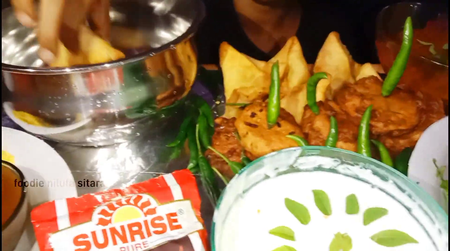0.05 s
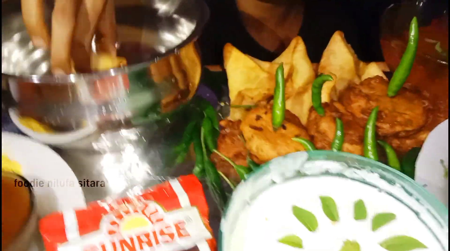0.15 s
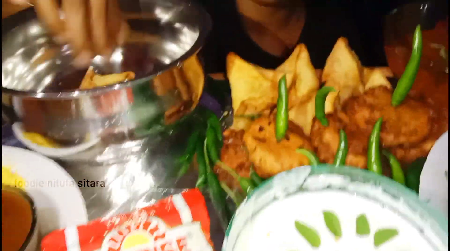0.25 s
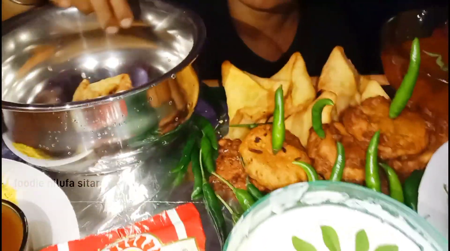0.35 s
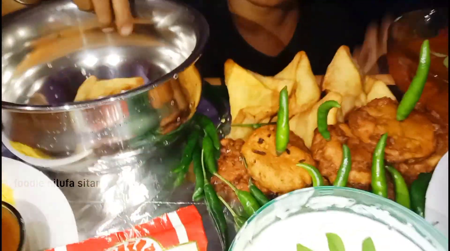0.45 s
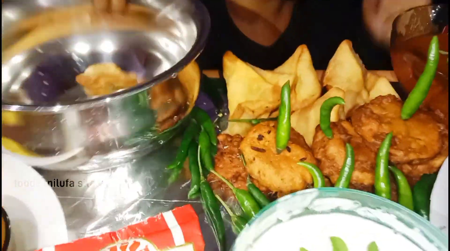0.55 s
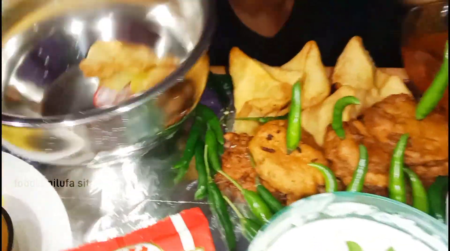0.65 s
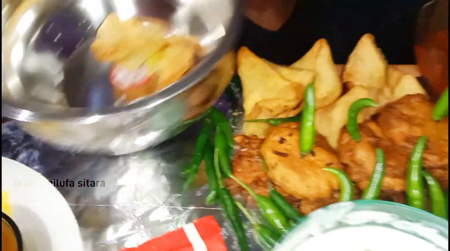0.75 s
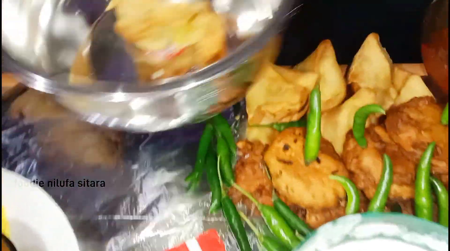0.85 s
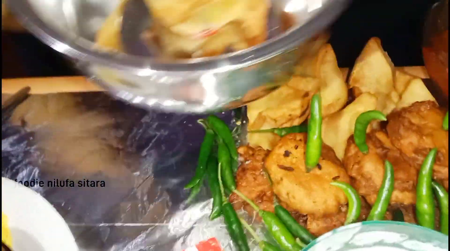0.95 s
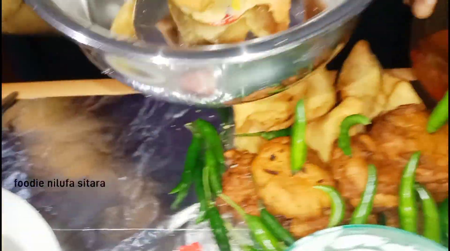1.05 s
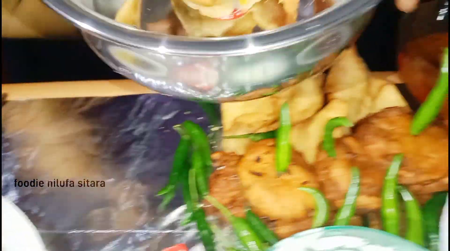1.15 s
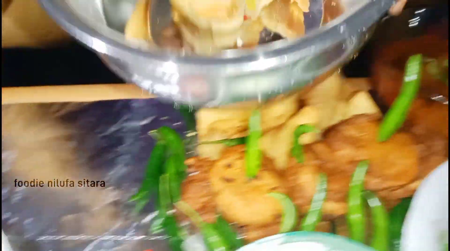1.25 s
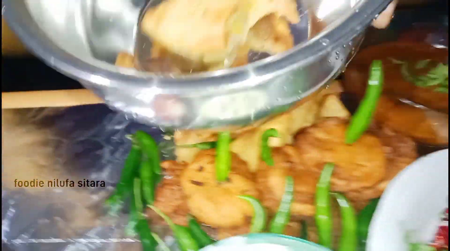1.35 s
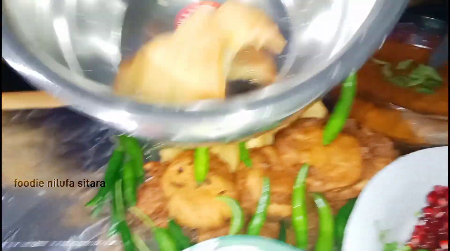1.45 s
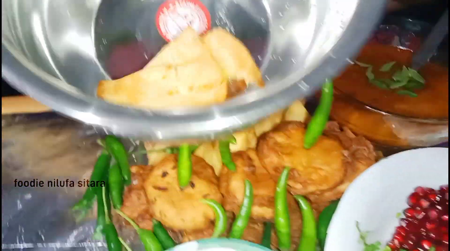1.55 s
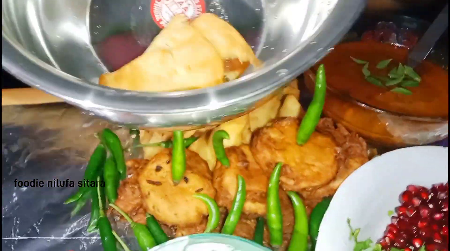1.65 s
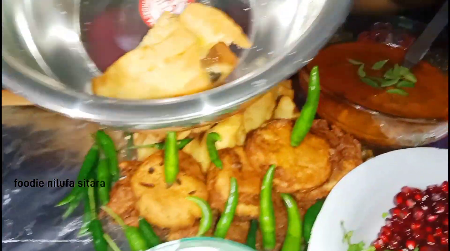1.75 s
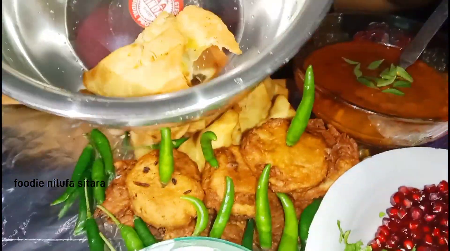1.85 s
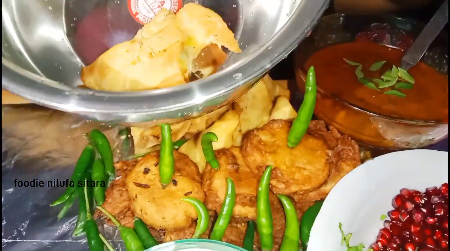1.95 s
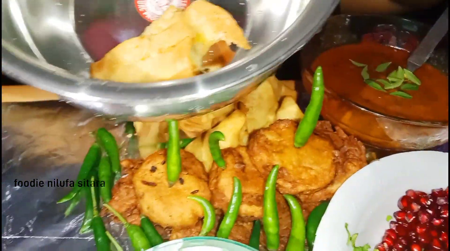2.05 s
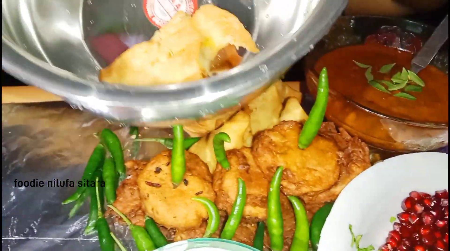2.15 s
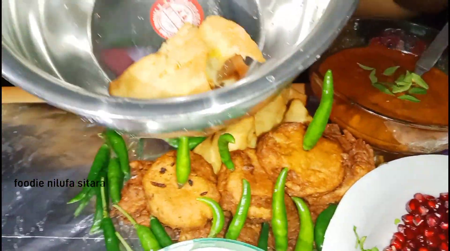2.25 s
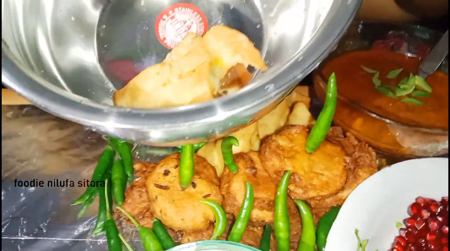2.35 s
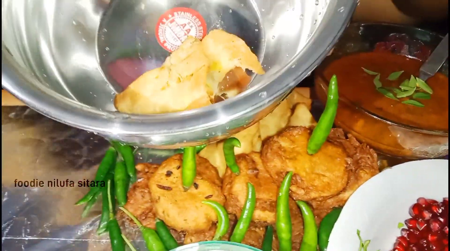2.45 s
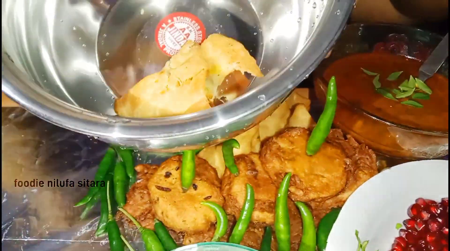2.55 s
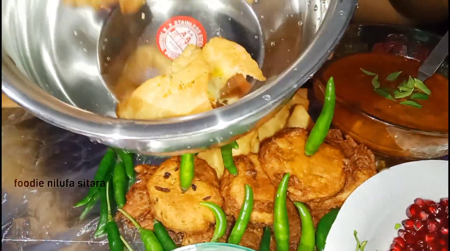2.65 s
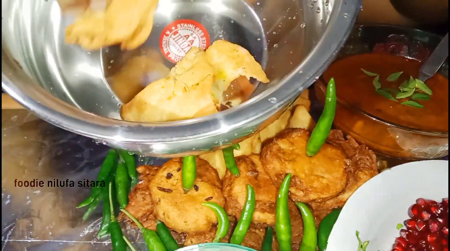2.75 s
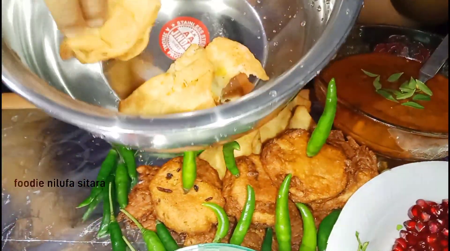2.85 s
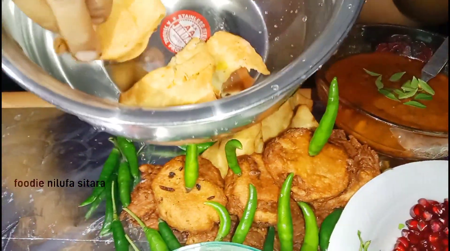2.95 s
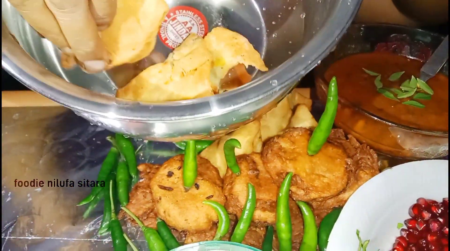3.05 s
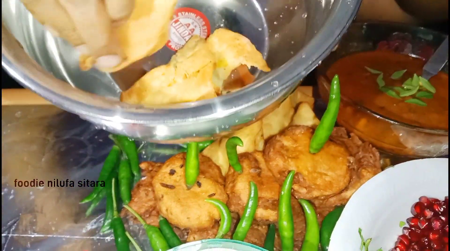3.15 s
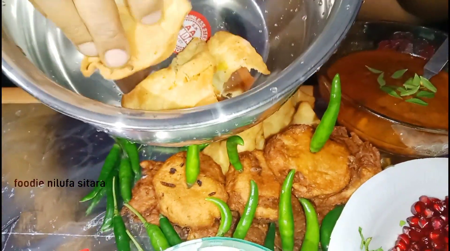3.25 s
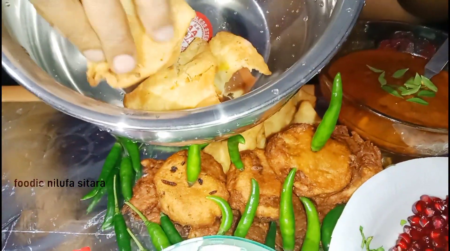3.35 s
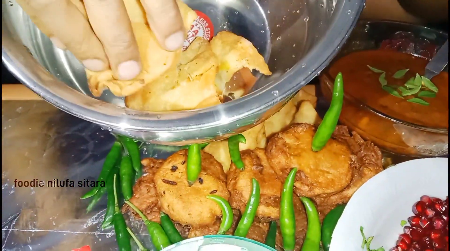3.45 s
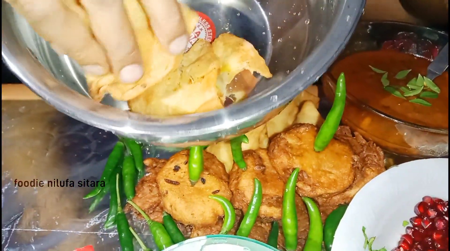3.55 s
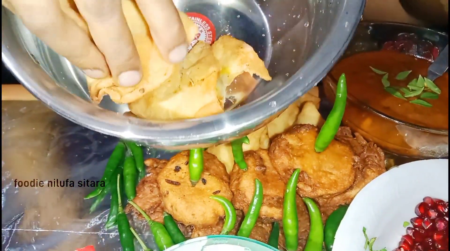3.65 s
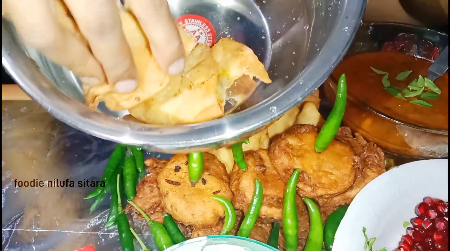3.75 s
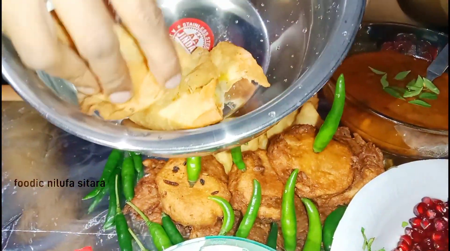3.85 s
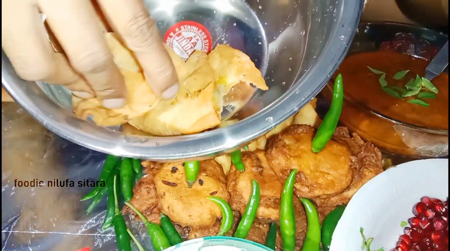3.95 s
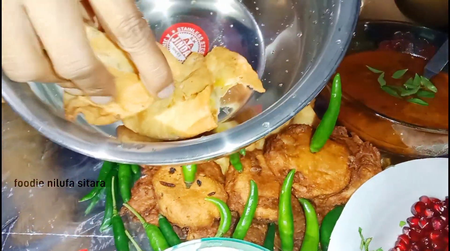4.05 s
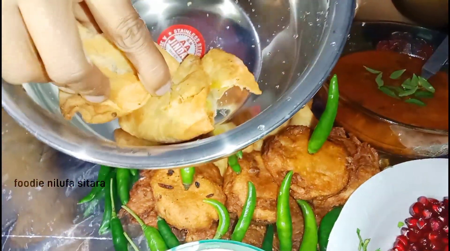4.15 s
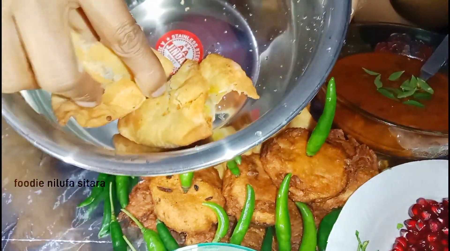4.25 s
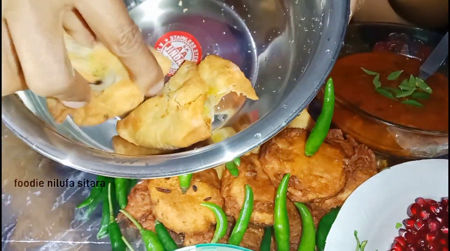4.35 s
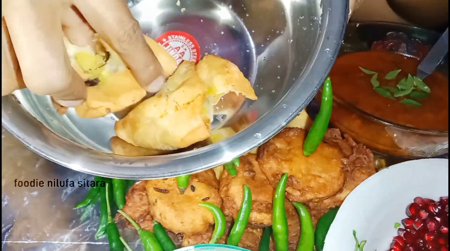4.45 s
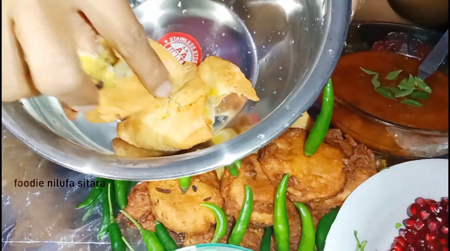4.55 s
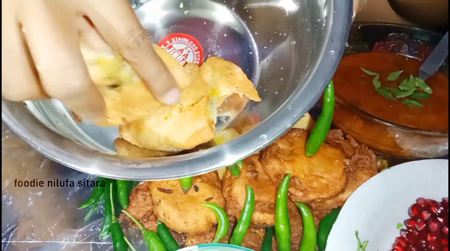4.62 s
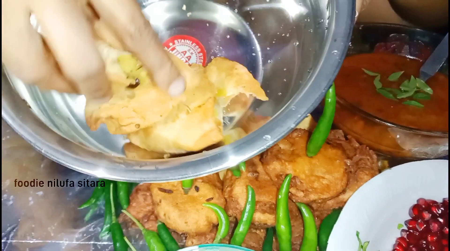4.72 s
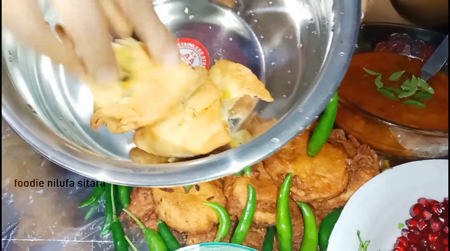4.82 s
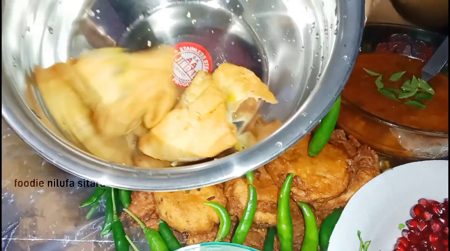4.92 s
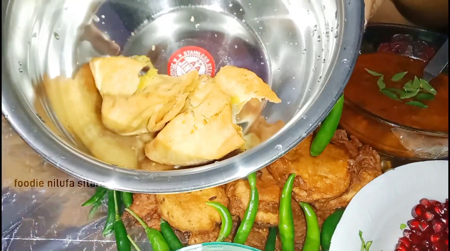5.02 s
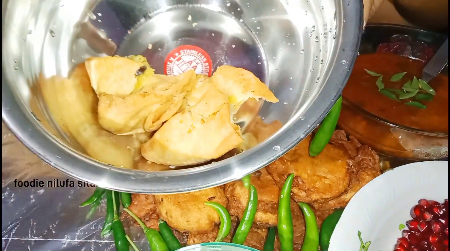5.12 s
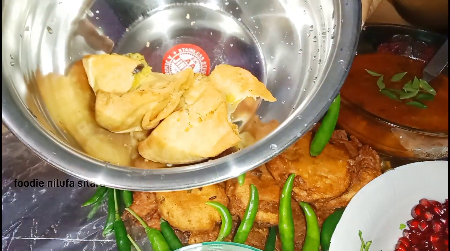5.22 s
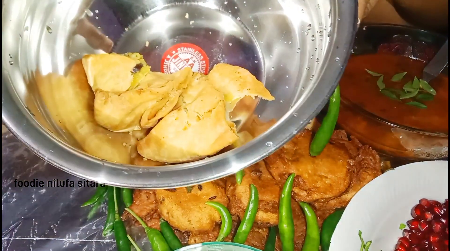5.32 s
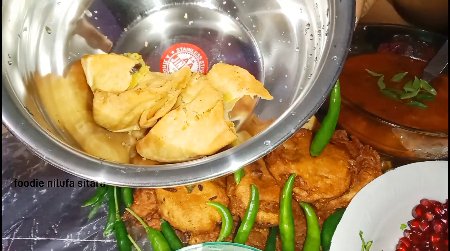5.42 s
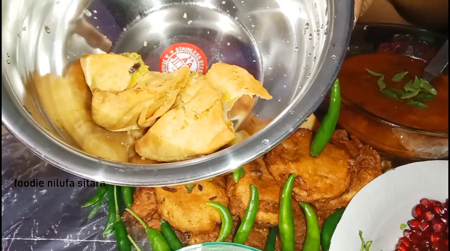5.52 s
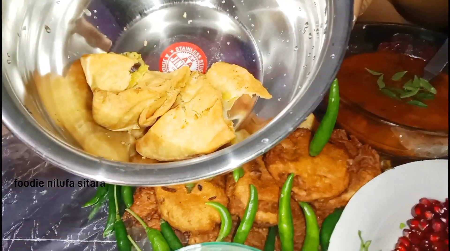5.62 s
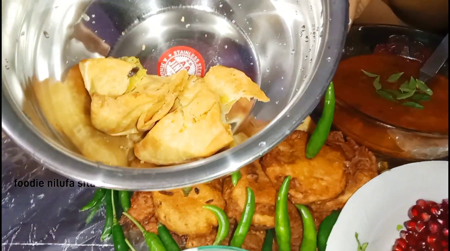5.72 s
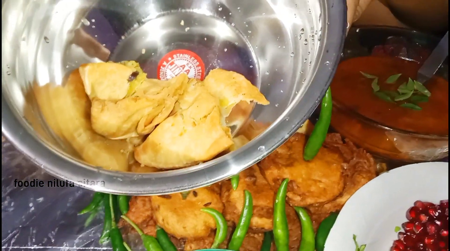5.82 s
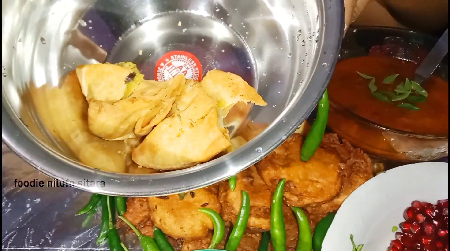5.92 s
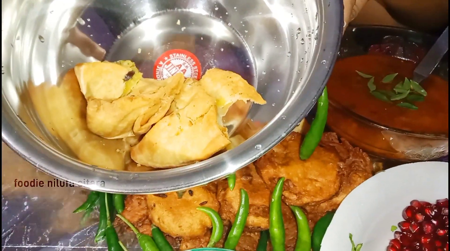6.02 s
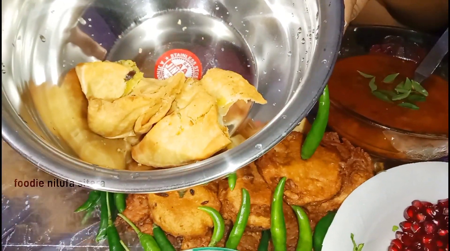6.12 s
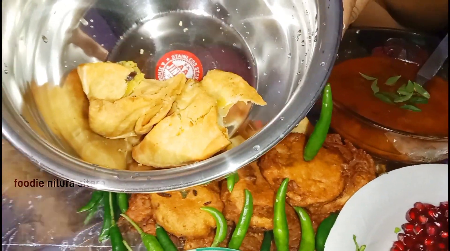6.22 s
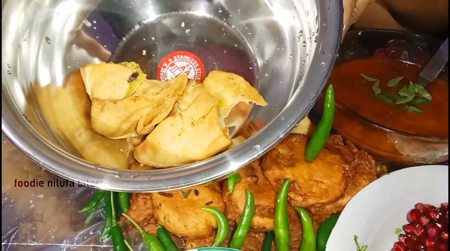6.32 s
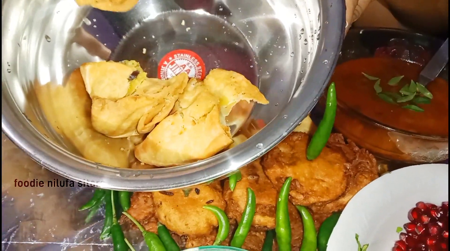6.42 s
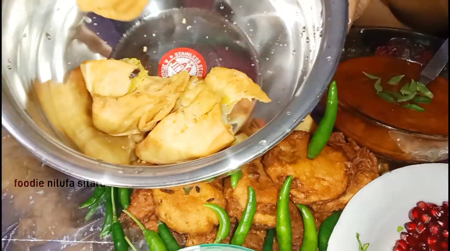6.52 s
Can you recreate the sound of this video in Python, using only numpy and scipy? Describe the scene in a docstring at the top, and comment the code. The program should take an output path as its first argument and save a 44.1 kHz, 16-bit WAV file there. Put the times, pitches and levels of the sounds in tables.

```python
"""Crisp pastry is dropped, slid and crushed by hand in a thin steel bowl, close to a small microphone.
First come low slips of the gripped bowl and dull knocks; then crust and crumbs rustle as grains of noise.
Crust snaps in short noise bursts, and rubbing and blows set the bowl's modes ringing as fading sines.
From about 2 s a bird outside repeats a falling whistle, blurred by echoes; the snaps crowd near 4 s.
Later come a few more snaps and quieter rubbing. A faint, uneven hush lasts throughout."""
import sys
import numpy as np
from scipy import signal
from scipy.fft import rfft, irfft
from scipy.io import wavfile
from scipy.ndimage import uniform_filter1d

SR = 44100
rng = np.random.default_rng(int(sys.argv[2]) if len(sys.argv) > 2 else 0)


def boost_factor(decibels):
    """Convert a level in decibels to a linear amplitude factor."""
    exponent = np.asarray(decibels, float) / 20
    return 10 ** exponent


def unload_wav(signal):
    """Save mono or channel-first audio to the path in sys.argv[1] as 16-bit WAV at rate SR, clipped to [-1, 1]."""
    wavfile.write(
        sys.argv[1],
        SR,
        np.round(np.clip(np.atleast_2d(signal).T, -1, 1) * 32767).astype(np.int16),
    )


N = 290178   # length in samples, about 6.6 s

# Colour of the faint background hush, before its bands swell and dip:
# (frequency [Hz], relative level [dB])
HUSH_COLOUR = [(18, -34), (30, -12), (49, -13), (109, 1.5), (437, -12.5), (1320, -10), (2290, -16),
               (4530, -17), (5740, -9.5), (7270, -14), (15450, -18.5), (15620, -39.5)]
HUSH_DB = -79
# The bowl gripped, dragged and bumped; the fall time spans SWING_DB:
# (time at full strength [s], relative rumble level [dB], hold [s], fall [s], pitch [Hz])
BOWL_SLIPS = [(-0.003, -45, 0.0094, 0.037, 236), (0.04, -56.5, 0.03, 0.038, 216),
              (0.2, -46, 0.07, 0.066, 710), (0.226, -56, 0.0081, 0.035, 393),
              (0.266, -34, 0.038, 0.082, 790), (0.269, -52.5, 0.024, .1, 198.5),
              (0.566, -70.5, 0.065, 0.035, 188), (0.648, -44, 0.1, 0.12, 637),
              (0.658, -47, 0.089, 0.028, 194), (0.842, -51, 0.16, 0.14, 546),
              (0.95, -51.5, 0.042, 0.045, 177), (1.101, -53.5, 0.02, 0.02, 156),
              (1.295, -55, 0.19, 0.092, 515), (1.402, -64, 0.16, 0.5, 137), (1.58, -62.5, 0.033, 0.55, 664),
              (1.607, -64.5, 0.074, 0.25, 205), (1.821, -58.5, 0.05, 0.029, 108),
              (2.742, -62, 0.009, 0.047, 173.7), (3.2, -54, 0.014, 0.11, 653), (3.29, -60, 0.02, 0.28, 668),
              (4.998, -41.5, 0.12, 0.049, 579), (4.999, -53.5, 0.022, 0.057, 181),
              (6.299, -61.5, 0.033, 0.18, 620)]
GRIP_RISE_S = 0.008   # time to rise by SWING_DB
GRIP_SPREAD_OCTAVES = 0.45   # this far from a grip's pitch, its level is 15 dB lower
SWING_DB = 20   # level change covered by each rise or fall time
# Dull knocks on table and food: (time [s], peak level [dB], main pitch [Hz], time to fade by 60 dB [s])
DULL_KNOCKS = [(.122, -54.5, 155, 0.074), (.202, -28, 624, 0.066), (.267, -16.5, 749, 0.025),
               (.642, -37.5, 706, 0.03), (.663, -32.5, 207, 0.044), (.925, -37, 673, 0.13),
               (1.0, -40, 340, 0.0062), (.94, -39.5, 212, 0.0067), (1.109, -48, 2230, 0.022),
               (1.235, -39, 112, 0.018), (1.235, -34.5, 364, 0.0097), (1.398, -48, 226, 0.022),
               (3.047, -56.5, 790, 0.038), (3.206, -50, 600, 0.098), (3.2, -57, 817, 0.12),
               (3.776, -31.5, 1343, 0.056), (3.775, -49, 597, 0.047), (4.992, -17, 1210, 0.011),
               (4.993, -31.5, 218, 0.012), (5.074, -29, 458, 0.094), (6.125, -39.5, 1250, 0.023),
               (6.127, -53.5, 358, 0.16)]
# Strokes of hand, crust and crumbs rubbing; rise and fall times span SWING_DB:
# (time at full strength [s], level [dB], rise [s], hold [s], fall [s])
RUBBING_STROKES = [(0.203, -51.5, 0.0033, 0.015, 0.14), (0.267, -39, 0.0027, 0.027, 0.057),
                   (0.312, -39.5, .03, 0.0054, 0.089), (0.615, -49, 0.0083, 0.0011, 0.16),
                   (0.709, -33.5, .06, 0.03, 0.1062), (0.746, -28.5, .02, 0.015, 0.047),
                   (0.9, -46, 0.16, 0.058, 0.2), (1.149, -61, 0.087, 0.044, 0.043),
                   (1.284, -50, 0.075, 0.16, 0.15), (1.515, -41.5, 0.097, 0.0077, 0.034),
                   (1.566, -41, 0.017, 0.045, 0.097), (1.798, -55, 0.21, 0, 0.22),
                   (2.058, -60, 0.091, 0.014, 0.06), (2.733, -53.5, 0.0037, 0.0041, 0.099),
                   (2.873, -54.5, 0.052, 0, 0.057), (3.073, -68.5, 0.32, 0, 0.23),
                   (3.207, -42.5, 0.017, 0, 0.28), (3.306, -36, 0.013, 0.025, 0.052),
                   (3.387, -49.5, 0.055, 0.39, 0.2), (3.776, -35.5, 0.017, 0, 0.13),
                   (3.951, -38, 0.0059, 0.034, 0.02), (4.006, -46.5, 0.042, 0.37, 0.091),
                   (4.13, -33.5, 0.011, 0.002, 0.03), (4.152, -31, 0.011, 0.0049, 0.056),
                   (4.306, -50, 0.069, 0.0092, 0.3), (4.426, -41.5, 0.087, 0.013, 0.092),
                   (4.526, -50, 0.049, 0.087, 0.067), (4.69, -55, 0.0076, 0.043, 0.06),
                   (4.777, -50, 0.039, 0.023, 0.09), (4.876, -54, 0.067, 0, .05),
                   (4.918, -53.5, .006, 0.0085, 0.015), (4.997, -25.5, 0.0023, 0.0041, 0.011),
                   (5.03, -36.5, 0.016, 0.074, 0.055), (5.149, -44, 0.0045, 0.00026, 0.068),
                   (5.599, -64.5, 0.028, 0.044, 0.11), (5.74, -62, 0.041, 0.025, 0.082),
                   (6.124, -53, 0.0028, 0.048, 0.056), (6.314, -49, 0.073, 0.011, 0.18),
                   (6.493, -50, 0.22, 0.089, 0.081)]
# How each stage of the work sounds, held until the next, relative to the rustle:
# (start [s], sizzle [dB], crunch [dB], crackle [dB])
GRAIN_STAGES = [(0, -4.5, -6, -21.5), (.65, 3, -6, -20.5), (.83, -2, -10, -6.5), (1.25, -5, -13.5, -9),
                (1.7, -6.5, -19.5, 5.5), (2.7, -4, -29, 2.5), (3.19, -9, -10.5, -8.5),
                (3.42, -6, -17.5, -2.5), (3.74, -0.5, -10, 15.5), (3.94, -6.5, -21.5, 1),
                (4.6, -6.5, -14.5, -7.5), (4.99, -4.5, -11.5, 0), (5.5, -1.5, -8, -9), (6.1, -7, -10, 0)]
# How the bowl rings in each stage, held until the next, relative to the rustle:
# (start [s], free modes [dB], modes damped by hand and food [dB], dense shimmer [dB])
RING_STAGES = [(0, -60, -40, -26.5), (.8, -41.5, -34.5, -1.5), (1.1, -63.5, -67, -12.5),
               (1.25, -30.5, -35.5, 0), (1.65, -56.5, -41, -4), (2.7, -65.5, -56, -6.5),
               (3.19, -66.5, -51.5, -14.5), (4.18, -72, -50.5, -16.5), (4.7, -63, -40.5, -6.5),
               (4.99, -52.5, -31.5, 0), (5.5, -72, -55, -8), (6.1, -66.5, -53, -12)]
# Colour of breaking crust: (frequency [Hz], relative level [dB])
CRUST_COLOUR = [(1530, -52.5), (2600, -13.5), (3420, -22.5), (4370, -19), (4800, -9), (5300, -1),
                (5550, 5.5), (6200, 3.5), (6950, 0.5), (7500, -15), (9000, -22.5), (11700, -47.5),
                (19800, -120)]
# Colour of the fine crumbs: (frequency [Hz], relative level [dB])
SIZZLE_COLOUR = [(4710, -32), (8000, -11.5), (11000, -5), (12900, 1.5), (15480, -5.5), (15620, -36)]
# Colour of the thick folds: (frequency [Hz], relative level [dB])
CRUNCH_COLOUR = [(400, -45), (900, -20), (1010, -15), (1640, -9.5), (1820, -7.5), (3330, -2), (4200, -19),
                 (5460, -10), (9240, -120)]
# Main modes of the freely ringing bowl:
# (frequency [Hz], relative level [dB], time to fade by 60 dB [s])
BOWL_MODES = [(427, 0, .55), (696, -10, .6), (1292, -2, .42), (1351, -10, .2), (1577, -18, .2),
              (1800, -15, .25), (1846, -15, .35), (2051, -12, .35), (2500, -16, .3), (2735, -15, .25),
              (2993, -13, .3), (3280, -15, .3), (3564, -13, .3), (4533, -16, .3), (5095, -16, .25),
              (5507, -9, .25), (5809, -5, .2), (5943, -8, .2), (6035, -7, .2), (6309, -4, .2),
              (6420, -7, .2), (6562, -10, .2), (6934, -6, .2), (7280, -14, .2)]
DAMPED_SHARE = 0.51   # damped ringing time, as a share of each mode's free time
# Strength of the bowl's crowd of weak modes: (frequency [Hz], relative level [dB])
WEAK_MODES = [(2700, -0.5), (3700, -6), (4200, -13.5), (5300, -10), (5600, 3.5), (9000, -1.5)]
# Blows that set the bowl ringing:
# (time [s], level of the lowest mode [dB], hardness [dB per octave], time until hand or food damps it [s])
BOWL_BLOWS = [(1.569, -37.5, -25, .4), (2.737, -64, -12, 0.14), (4.993, -35.5, -4.5, 0.17),
              (5.048, -51.5, 3.5, 0.144), (5.136, -69, 7, 0.12)]
# Crust breaking: (time [s], peak level [dB], thick fold above that peak [dB], thick fold pitch [Hz])
CRUST_SNAPS = [(.751, -19, -6, 2786), (1.572, -14, -16, 1313), (1.619, -23, -24.5, 4470),
               (1.808, -30, -34, 1275), (2.0463, -35.5, -22, 3676), (2.7386, -32, -20.5, 2210),
               (2.76, -40, -6.5, 2565), (3.2093, -31.5, -9.5, 2810), (3.247, -30, -17.5, 2390),
               (3.3132, -29, -8.5, 2880), (3.4, -30.5, -22.5, 3240), (3.47, -27, -19, 4170),
               (3.538, -34, -14, 2290), (3.5635, -31.5, -15, 2350), (3.664, -29, -26, 2403),
               (3.709, -34, -19, 2357), (3.7226, -27.5, -13.5, 2310), (3.7434, -20.5, -28, 2924),
               (3.7783, -10, -14, 3125), (3.79, -17.5, -14, 3380), (3.798, -19.5, -15, 3320),
               (3.8166, -17.5, -43, 3306), (3.859, -21.5, -18.5, 3000), (3.897, -26.5, -33, 3700),
               (3.9539, -18, -24, 3350), (3.9759, -23.5, -3, 2398), (3.9963, -30, -21.5, 2930),
               (4.0101, -22, -3, 2440), (4.055, -20.5, -17, 3316), (4.0816, -27.5, -11.5, 3035),
               (4.123, -4.5, -34.5, 2583), (4.1495, -11, -22, 2180), (4.1525, -6.5, -17, 3203),
               (4.1625, -20.5, -17, 4120), (4.1715, -17.5, -20, 3874), (4.191, -16.5, -21.5, 3490),
               (4.2865, -20.5, -34, 2800), (4.395, -30.5, -9, 3300), (4.423, -16.5, -33, 3300),
               (4.534, -42.5, 0, 2110), (4.758, -28.5, -27, 3400), (4.774, -24.5, -12, 1470),
               (4.9933, -12, -19, 1210), (4.999, -22, -13.5, 1250), (5.053, -22.5, -24, 3000),
               (5.0797, -19, -24, 2077), (6.127, -25.5, -26, 1330), (6.349, -27.5, -16, 4240),
               (6.379, -35, -8.5, 3780), (6.462, -25.5, -9, 3996), (6.4924, -16.5, -14.5, 4274),
               (6.539, -28.5, -18.5, 1220), (6.5545, -31.5, -6, 1710)]
# The bird's whistles: (start [s], average level [dB])
BIRD_CALLS = [(1.974, -64.5), (2.305, -63.5), (2.638, -61), (2.974, -62.5), (3.364, -55.5), (3.764, -54),
              (4.221, -54), (4.69, -57.5), (5.876, -65)]
# The course of one whistle: (time [s], pitch [Hz], relative level [dB])
WHISTLE_COURSE = [(0, 6170, -11.5), (.03, 6200, -1), (.06, 5150, 2), (.09, 3992, -4.5), (0.142, 3300, 2.5),
                  (.2, 2726, -18), (0.227, 2850, -22.5)]


def rms_one(x):
    """Scale a sound to an average (rms) strength of 1."""
    return x / np.sqrt(np.mean(x ** 2) + 1e-20)


def convolve(x, kernel):
    """Let every sample of x start a copy of the kernel; cut to the scene's length."""
    return signal.fftconvolve(x, kernel)[:N]


def response(colour):
    """Minimum-phase pulse with the given colour, made by folding the cepstrum; energy 1."""
    hz, db = np.transpose(colour)
    grid = np.maximum(np.fft.rfftfreq(8192, 1 / SR), 1)
    log_strength = np.interp(np.log(grid), np.log(hz), db) * np.log(10) / 20
    cepstrum = irfft(log_strength)
    # move the backward half of the pulse's cepstrum forward in time
    cepstrum[1:4096] *= 2
    cepstrum[4097:] = 0
    pulse = irfft(np.exp(rfft(cepstrum)))[:4096]
    return pulse / np.sqrt(np.sum(pulse ** 2))


def ring(clicks, hz, t60):
    """A resonance: a unit click starts a sine of height 1 that fades by 60 dB in t60 seconds."""
    shrink = boost_factor(-60 / (t60 * SR))
    turn = 2 * np.pi * hz / SR
    return signal.lfilter([0, np.sin(turn)], [1, -2 * shrink * np.cos(turn), shrink ** 2], clicks + 1e-18)


def dying(shape, t60):
    """Noise that fades by 60 dB in t60 seconds."""
    return rng.standard_normal(shape) * boost_factor(-60 * np.arange(shape[-1]) / SR / t60)


def add(out, s, sound):
    """Mix a sound into out, starting at s seconds."""
    i = round(s * SR)
    out[i:i + len(sound)] += sound[:N - i]


def grains(per_s, spread_db, smooth):
    """Tiny fractures of uneven size at random moments, over a smooth friction hiss; rms 1."""
    size_db = spread_db * np.minimum(rng.exponential(1, N), 3.5)
    sizes = boost_factor(size_db) * rng.choice([-1, 1], N)
    breaks = rng.random(N) < per_s / SR
    return rms_one(rms_one(sizes * breaks) + smooth * rng.standard_normal(N))


def swells(s, db, rise_s, hold_s, fall_s):
    """One dB envelope per event, on a millisecond grid: straight rise, hold, straight fall."""
    t = np.arange(0, N / SR, .001) - s[:, None]
    early = np.maximum(-t, 0) / rise_s[:, None]
    late = np.maximum(t - hold_s[:, None], 0) / fall_s[:, None]
    return db[:, None] - SWING_DB * np.minimum(early + late, 8)


def at_samples(per_ms):
    """Spread millisecond values over all samples along straight lines."""
    return np.interp(np.arange(N) / SR, np.arange(len(per_ms)) / 1000, per_ms)


def together(envelopes_db):
    """Add the powers of all envelopes; gives one dB value per sample."""
    power = np.sum(boost_factor(2 * envelopes_db), axis=0)
    return at_samples(20 * np.log10(np.sqrt(power)))


def held(rows):
    """Hold each row's values until the next row starts."""
    s, *columns = np.transpose(rows)
    now = np.searchsorted(s[1:], np.arange(N) / SR)
    return [column[now] for column in columns]


def patchy(x, depth_db, patch_s, patch_hz):
    """Bands swell and dip in random patches of time and pitch; the treble stays more even."""
    z = signal.stft(x, nperseg=512, noverlap=384)[2]
    field = rng.standard_normal(z.shape)
    # blur the random field twice along pitch, then twice along time
    for axis, size in ((0, patch_hz * 512 / SR), (1, patch_s * SR / 128)):
        for _ in range(2):
            field = uniform_filter1d(field, max(round(size), 1), axis=axis)
    share = 1 / (1 + (np.fft.rfftfreq(512, 1 / SR) / 8000) ** 4)   # less patchy towards the treble
    gain = boost_factor(depth_db * share[:, None] * rms_one(field))
    return signal.istft(z * rms_one(gain), nperseg=512, noverlap=384)[1][:N]


def background_hush():
    """A faint, uneven hush: coloured noise whose bands swell and dip."""
    noise = convolve(rng.standard_normal(N), response(HUSH_COLOUR))
    return boost_factor(HUSH_DB) * patchy(noise, depth_db=3.5, patch_s=0.11, patch_hz=400)


def handling():
    """Low slips where the bowl meets table and hand; each grip sounds around a pitch of its own."""
    s, db, hold_s, fall_s, grip_hz = np.transpose(BOWL_SLIPS)
    grips = swells(s, db, GRIP_RISE_S + 0 * s, hold_s, fall_s)
    slips = grains(per_s=450, spread_db=6.0, smooth=0.31)
    out = np.zeros(N)
    for hz in np.geomspace(80, 1100, 16):
        off_db = 15.0 * (np.log2(grip_hz / hz) / GRIP_SPREAD_OCTAVES) ** 2
        band = ring(ring(slips, hz, 10.0 / hz), hz, 25.0 / hz)
        out += rms_one(band) * boost_factor(together(grips - off_db[:, None]) - 6)
    return out


def knocks():
    """Each knock is a damped thud: two fading modes, rounded by a soft contact."""
    out, click = np.zeros(N), signal.unit_impulse(8000)
    for s, db, hz, t60 in DULL_KNOCKS:
        modes = ring(click, hz, t60) + 0.12 * ring(click, 1.6 * hz, 0.99 * t60)
        contact = np.hanning(round(.4 * SR / hz) + 3)
        thud = np.diff(np.convolve(modes, contact))
        add(out, s, boost_factor(db) * thud / np.abs(thud).max())
    return out


def crackle(per_s, spread_db, cycles):
    """Small flakes break at random, each ringing at one of twelve pitches; rms 1."""
    flakes = grains(per_s, spread_db, smooth=0)
    dealt = rng.integers(0, 12, N)
    pitches = np.geomspace(1500, 13000, 12)
    return rms_one(sum(rms_one(ring(flakes * (dealt == k), hz, cycles / hz))
                       for k, hz in enumerate(pitches)))


def ticks(per_s, spread_db):
    """Lesser snaps at random: lone bursts of noise, each a few milliseconds long; rms 1."""
    return rms_one(convolve(grains(per_s, spread_db, smooth=0), dying((400,), t60=0.013)))


def shimmer(count, t60, main_db, main_t60):
    """A thin shell has a crowd of weak, close modes around its main ones; their common ring, energy 1."""
    t = np.arange(12000) / SR
    crowd = np.exp(rng.uniform(np.log(1000), np.log(15000), count))
    start_turn = rng.random((count + len(BOWL_MODES), 1))
    hz = np.append(crowd, [mode[0] for mode in BOWL_MODES])[:, None]
    is_main = (np.arange(len(hz)) >= count)[:, None]
    crowd_db = np.interp(hz, *np.transpose(WEAK_MODES)) - 60 * t / t60
    height_db = np.where(is_main, main_db - 60 * t / main_t60, crowd_db)
    sines = np.sin(2 * np.pi * (hz * t + start_turn))
    rings = np.sum(sines * hz ** .3 * boost_factor(height_db), axis=0)
    return rings / np.sqrt(np.sum(rings ** 2))


def rustle():
    """The same grains sound in crust, fine crumbs and thick folds; returns them and the push on the bowl."""
    level = together(swells(*np.transpose(RUBBING_STROKES)))
    sizzle_db, crunch_db, crackle_db = held(GRAIN_STAGES)
    free_db, damped_db, shimmer_db = held(RING_STAGES)
    fractures = grains(per_s=2000, spread_db=3.5, smooth=0.6)
    fractures += boost_factor(crackle_db) * crackle(per_s=1200, spread_db=5.5, cycles=16.0)
    fractures += boost_factor(crackle_db - 5.0) * ticks(per_s=230, spread_db=9.5)
    # make room for the crackle and the shimmer, so that they do not raise the level much
    fractures /= np.sqrt(1 + boost_factor(2 * crackle_db) + boost_factor(2 * shimmer_db))
    out = convolve(fractures * boost_factor(level), response(CRUST_COLOUR))
    out += convolve(fractures * boost_factor(level + sizzle_db), response(SIZZLE_COLOUR))
    out += convolve(fractures * boost_factor(level + crunch_db), response(CRUNCH_COLOUR))
    out += convolve(out * boost_factor(shimmer_db), shimmer(count=150, t60=0.17, main_db=5.5, main_t60=0.17))
    # light, hard crumbs hardly move the lowest modes
    light = signal.butter(4, 950, "high", fs=SR, output="sos")
    push = signal.sosfilt(light, fractures * boost_factor(level + np.array([free_db, damped_db])))
    return patchy(out, depth_db=3.0, patch_s=0.081, patch_hz=600), push


def bowl(free, damped):
    """Rubbing and blows ring the modes; a soft blow favours the low ones, a touch ends the ring."""
    out = np.zeros(N)
    lowest_hz = BOWL_MODES[0][0]
    for hz, db, t60 in BOWL_MODES:
        both = ring(free, hz, t60) + ring(damped, hz, DAMPED_SHARE * t60)
        out += boost_factor(db - 2.4 * np.log2(hz / lowest_hz)) * both
    click, t = signal.unit_impulse(26000), np.arange(26000) / SR
    for s, db, hardness_db, free_s in BOWL_BLOWS:
        rings = sum(boost_factor(mode_db + hardness_db * np.log2(hz / lowest_hz)) * ring(click, hz, t60)
                    for hz, mode_db, t60 in BOWL_MODES)
        touch_db = -990 * np.maximum(t - free_s, 0)   # falls 990 dB per second once touched
        add(out, s, boost_factor(db + touch_db) * rings)
    return out


def snaps():
    """Each snap is a brief burst of fracture with a faint crumbling tail; thick folds add a lower note."""
    shape = (len(CRUST_SNAPS), 2000)
    bursts = dying(shape, t60=0.009) + 0.077 * dying(shape, t60=0.018)
    bursts *= np.minimum(np.arange(2000) / (0.00072 * SR), 1)   # the crack needs a moment to run
    bright = response(CRUST_COLOUR) + boost_factor(-19.5) * response(SIZZLE_COLOUR)
    bright = bright[:400] * np.hanning(800)[400:]
    out = np.zeros(N)
    for (s, db, fold_db, fold_hz), burst in zip(CRUST_SNAPS, bursts):
        thin = np.convolve(burst, bright)
        fold = ring(np.diff(burst), fold_hz, 24.0 / fold_hz)
        add(out, s, boost_factor(db) * thin / np.abs(thin).max())
        add(out, s, boost_factor(db + fold_db) * fold / np.abs(fold).max())
    return out


def bird():
    """Falling whistles from afar: mostly scattered echoes, which smear each into a noisy fan."""
    s, hz, db = np.transpose(WHISTLE_COURSE)
    t = np.arange(round(s[-1] * SR)) / SR
    cycles = np.cumsum(np.interp(t, s, hz)) / SR
    note = boost_factor(np.interp(t, s, db)) * np.sin(2 * np.pi * cycles)
    lag = np.arange(12000) / SR
    echoes = dying((len(BIRD_CALLS), 12000), t60=0.98)
    echoes *= np.exp(-(lag / 0.16) ** 1.6) * np.minimum(lag / 0.02, 1)   # build up, then die away
    out = np.zeros(N)
    for (start, level_db), echo in zip(BIRD_CALLS, echoes):
        add(out, start, boost_factor(level_db) * rms_one(signal.fftconvolve(note, echo)))
    return out


def scene():
    """The near sounds gain a short room echo of fading noise; the bird is added as it is."""
    rubbing, push = rustle()
    near = handling() + knocks() + rubbing + bowl(*push) + snaps()
    room = rms_one(dying((9000,), t60=0.12)) / np.sqrt(9000)   # energy 1
    room_db = -11.0
    return (near + boost_factor(room_db) * convolve(near, room) + bird())[None]


def suppressor(x, threshold_db, memory, steepness):
    """Turns each frequency down as its recent power nears or sinks under a threshold: tails end early."""
    z = signal.stft(x, nperseg=512, noverlap=384)[2]
    power_now = np.abs(z) ** 2
    power = signal.lfilter([1 - memory], [1, -memory], power_now, axis=-1)
    power = np.maximum(power, 0.23 * power_now)   # onsets open it at once
    gain = (power / (power + boost_factor(2 * threshold_db))) ** steepness
    return signal.istft(z * gain, nperseg=512, noverlap=384)[1][..., :N]


def band_limit(x):
    """A steep low-pass at the top of the band."""
    return signal.sosfilt(signal.butter(12, 16500, fs=SR, output="sos"), x)


def record(dry):
    """The microphone drops the deep bass and the top; noise is suppressed and a faint hush added."""
    thin = signal.sosfilt(signal.butter(4, 100, "high", fs=SR, output="sos"), dry)
    thin = signal.sosfilt(signal.cheby2(20, 30, 15600, fs=SR, output="sos"), thin)
    cleaned = suppressor(thin, threshold_db=-99, memory=0.27, steepness=0.93)
    return band_limit(cleaned + background_hush())


dry = scene()
out = record(dry)
unload_wav(out)
```